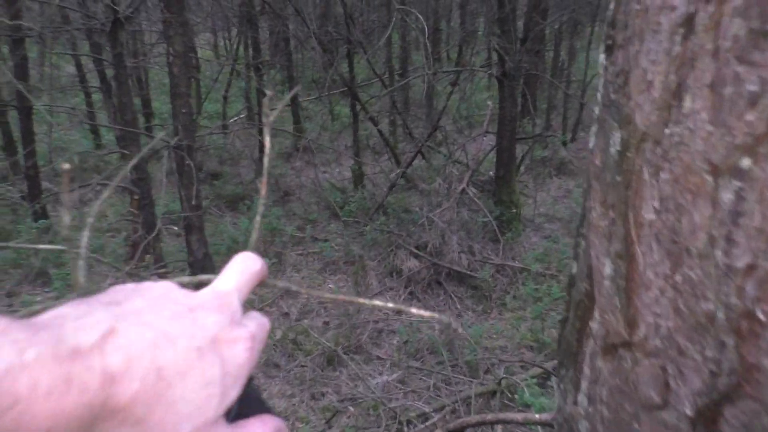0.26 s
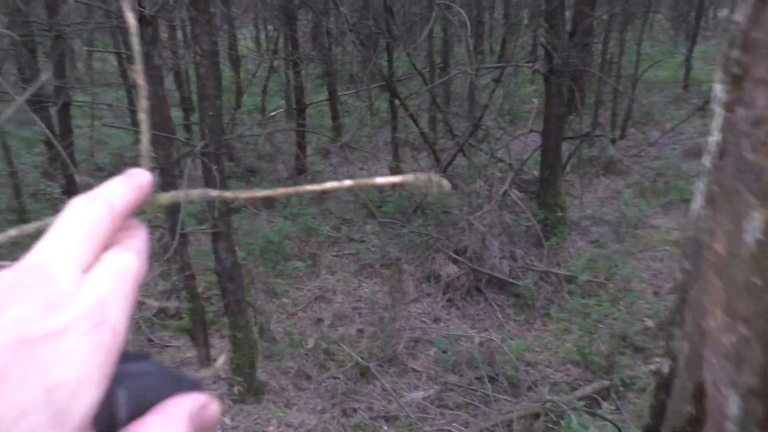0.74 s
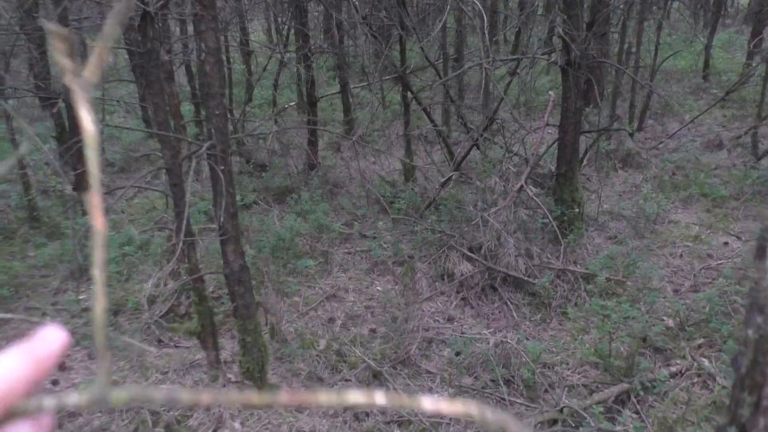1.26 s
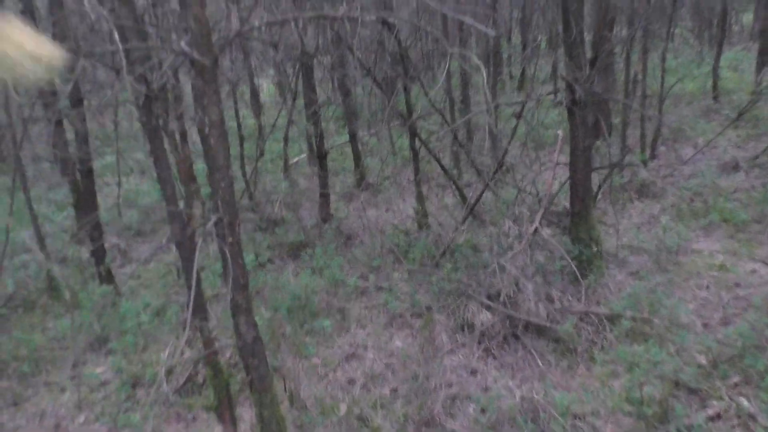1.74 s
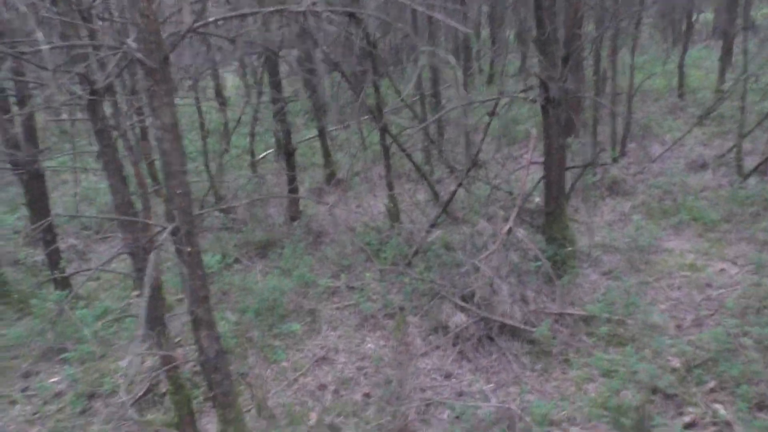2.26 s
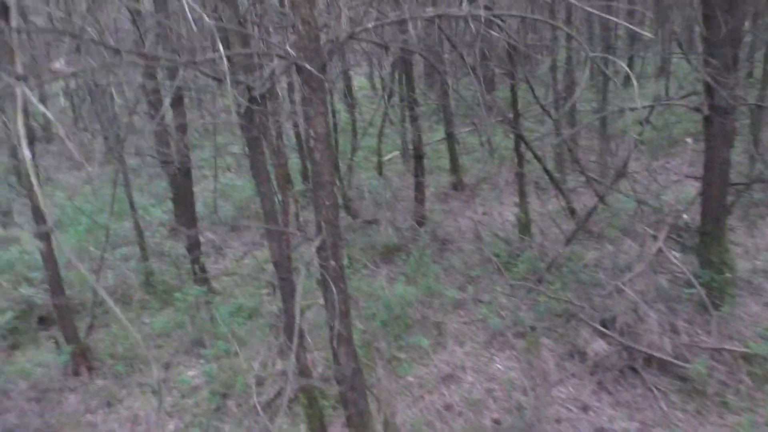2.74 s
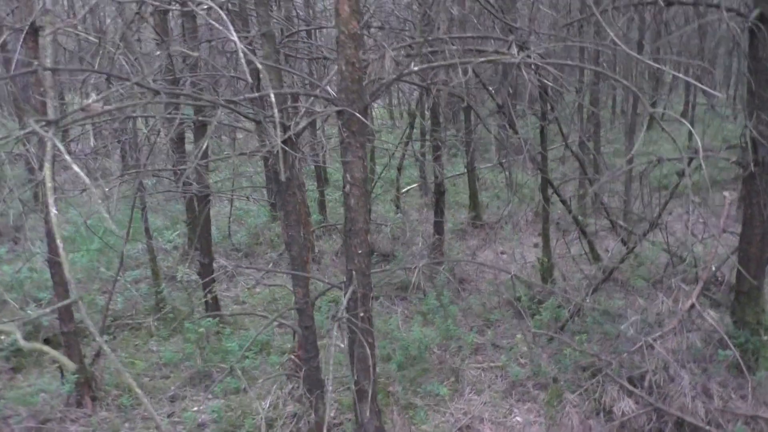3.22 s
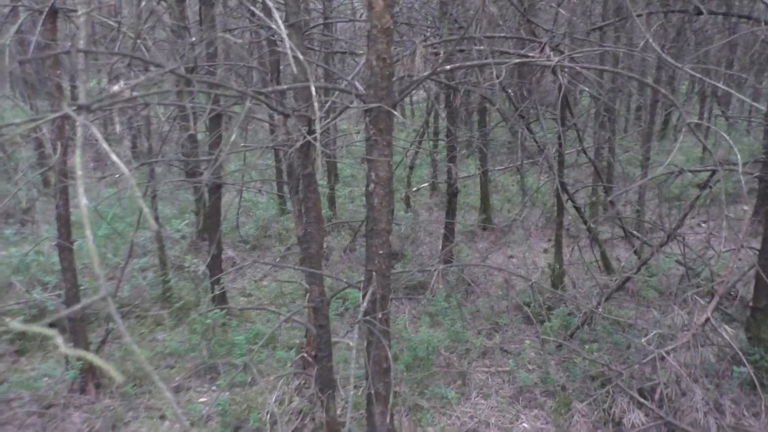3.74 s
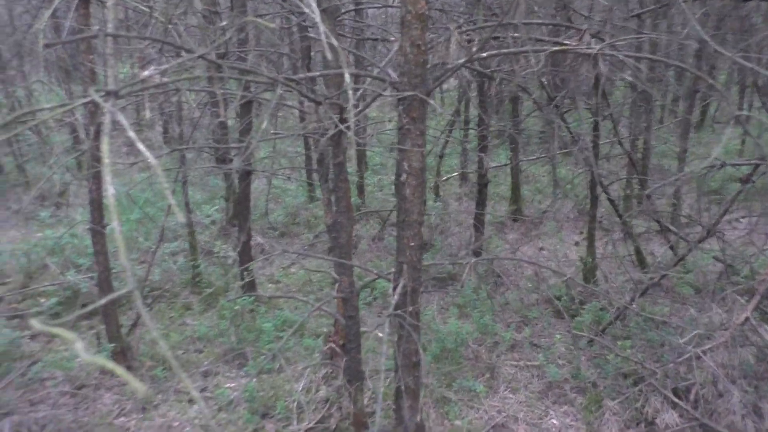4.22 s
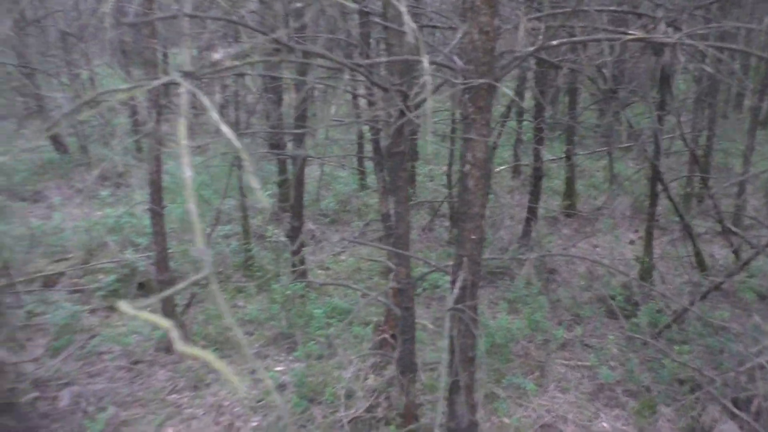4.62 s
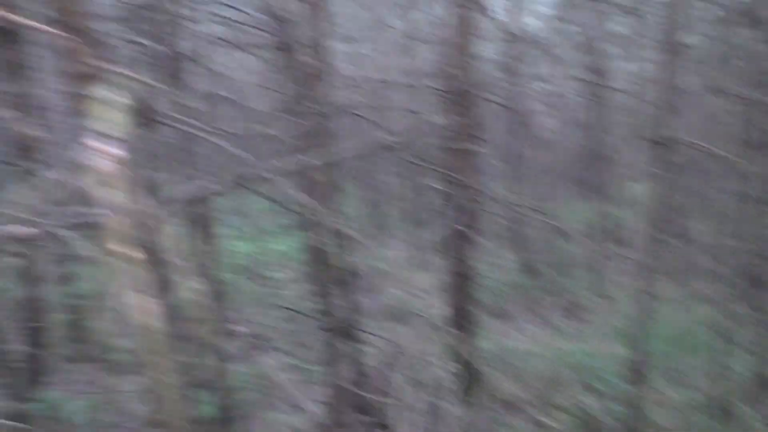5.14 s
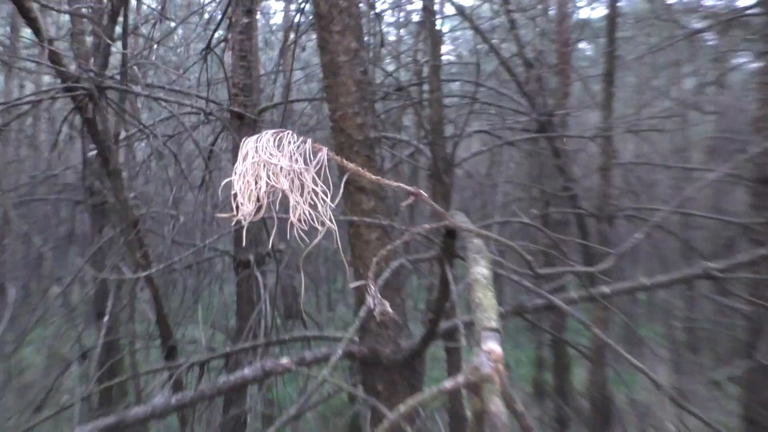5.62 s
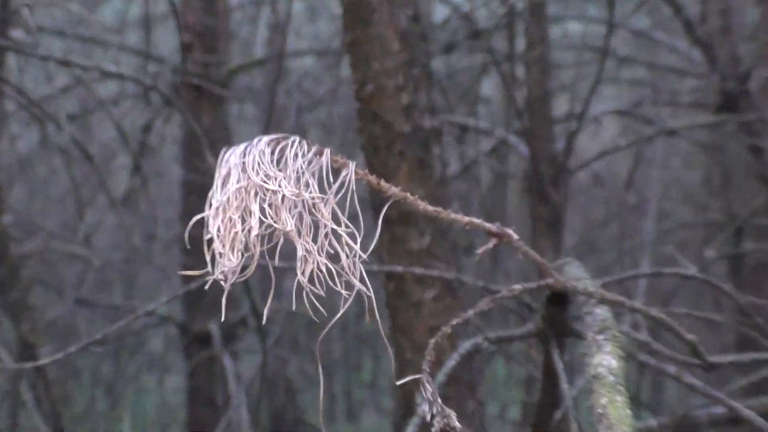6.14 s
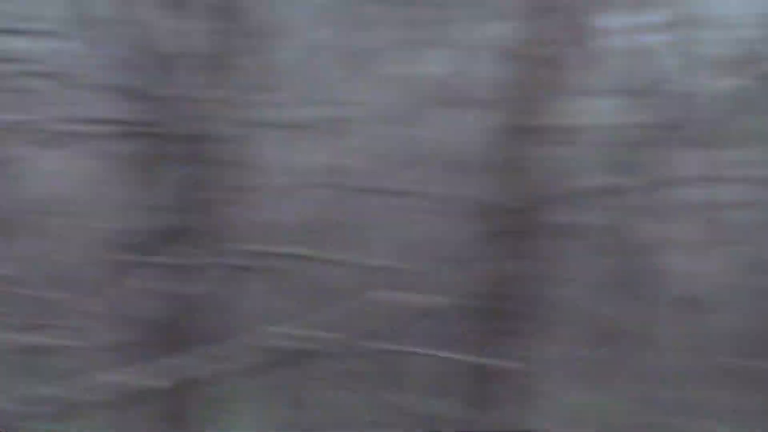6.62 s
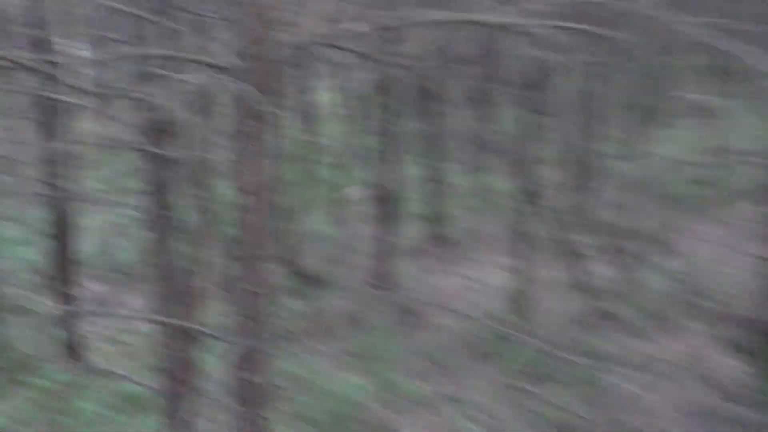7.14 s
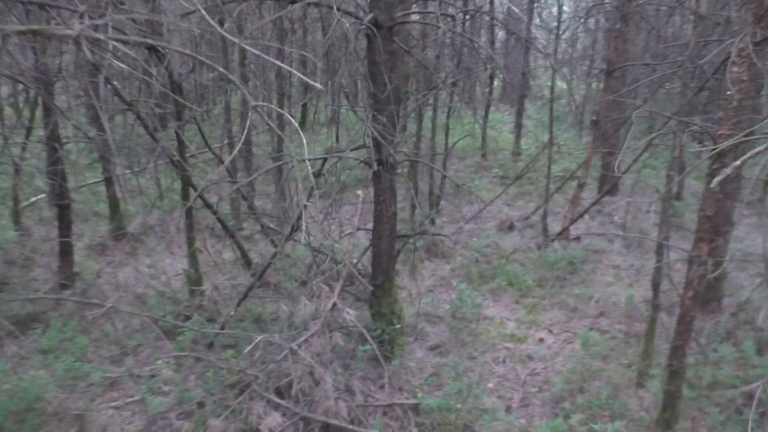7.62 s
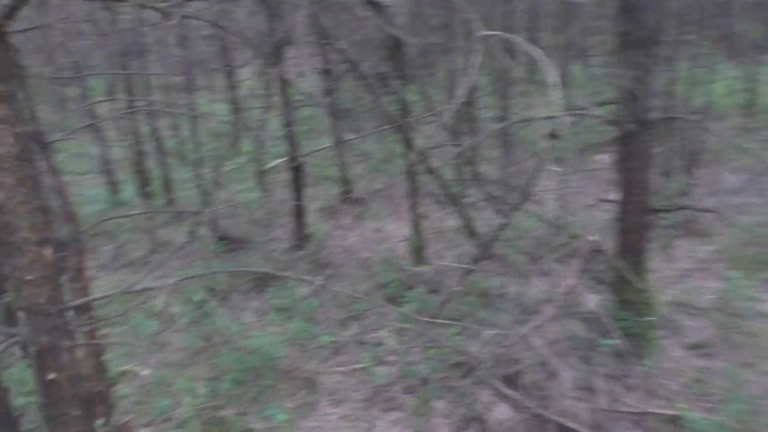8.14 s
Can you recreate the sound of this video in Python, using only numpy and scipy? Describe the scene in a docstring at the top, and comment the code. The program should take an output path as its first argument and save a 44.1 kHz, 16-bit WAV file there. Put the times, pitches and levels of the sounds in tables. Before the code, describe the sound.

Someone treads slowly through a dry pine wood, litter rustling and crunching while dead twigs snap sharply in irregular clusters over a faint airy hum.

```python
"""Dry litter rustles and crackles as someone treads slowly through a thin pine wood past dead twigs.
Each press drives grains of noise in three layers: leaves, stalks and soft ground.
Twigs snap as noise bursts with a bright crack, splintering, a ringing knock and falling bits.
Soles and sticks thud as damped low rings; a far hum of air, coloured noise, lies under it all."""
import sys
import numpy as np
from scipy import signal
from scipy.fft import rfft, irfft, next_fast_len
from scipy.io import wavfile

SR = 44100
rng = np.random.default_rng(int(sys.argv[2]) if len(sys.argv) > 2 else 0)


def generate_wav(signal):
    """Clip the signal to [-1, 1] and save it as 16-bit WAV at the path in sys.argv[1]."""
    frames = np.transpose(np.atleast_2d(signal))
    scaled = np.clip(frames, -1, 1) * 32767
    pcm = np.round(scaled).astype(np.int16)
    wavfile.write(sys.argv[1], SR, pcm)


N = 369537


def from_db(db):
    """Decibels to gain."""
    return 10 ** (np.asarray(db) / 20)


def rms_one(x):
    """Scale to rms 1."""
    return x / np.sqrt(np.mean(x ** 2) + 1e-20)


def peak_one(x):
    """Scale to peak 1."""
    return x / np.abs(x).max()


def in_time(rows):
    """Draw each column of a breakpoint curve sample by sample."""
    seconds, *columns = np.transpose(rows)
    t = np.arange(N) / SR
    return [np.interp(t, seconds, column) for column in columns]


def coloured(x, spectrum):
    """Shape a signal by a (Hz, dB) table, with the phase of a causal filter."""
    size = next_fast_len(len(x) + 2048)
    hz, db = np.transpose(spectrum)
    log_hz = np.log(np.arange(size // 2 + 1) * SR / size + 1)
    log_gain = np.interp(log_hz, np.log(hz), db) * np.log(10) / 20
    # Folding the cepstrum onto positive time gives minimum phase
    cepstrum = irfft(log_gain, size)
    cepstrum[1:size // 2] *= 2
    cepstrum[size // 2 + 1:] = 0
    response = np.exp(rfft(cepstrum))
    return irfft(rfft(x, size) * response, size)[:len(x)]


def drift(rate_hz):
    """Slow random wandering of spread 1: noise through a double one-pole lowpass."""
    r = np.exp(-2 * np.pi * rate_hz / SR)
    noise = rng.standard_normal(N + SR)
    slow = signal.lfilter([1], [1, -2 * r, r * r], noise)
    return rms_one(slow[SR:])   # skip the filter's start-up


def ring(x, hz, cycles):
    """A damped resonator: a unit click sets a sine ringing that falls 60 dB in so many cycles."""
    r = from_db(-60 * hz / (cycles * SR))
    w = 2 * np.pi * hz / SR
    return signal.lfilter([0, np.sin(w)], [1, -2 * r * np.cos(w), r * r], x)


def air():
    """Broad hum and hiss of the wood: coloured noise on a level curve, wavering a little."""
    # Far hum, lower after the loudest snap, before the lift below: (time [s], level [dB])
    hum = [(0.0, -62.5), (1.56, -63), (2.94, -59.5), (3.55, -62), (4.34, -60), (4.48, -68.5), (5.06, -65.5),
           (6.93, -61), (7.21, -61), (7.82, -60.5), (8.19, -60), (8.38, -52.5)]
    # Relative colour of the air: (frequency [Hz], level [dB per Hz])
    air_colour = [(15, -42), (25, -13), (74, 3), (167, 0), (357, 2.5), (456, 1), (582, -3.5), (806, -4),
                  (1030, 0), (2080, -11), (2810, -15), (4710, -56), (6170, -40), (12500, -17.5),
                  (16400, -21)]
    lift_db, waver_db, waver_hz = 2.5, 1.0, 4.6
    hum_db, = in_time(hum)
    level_db = hum_db + lift_db + waver_db * drift(waver_hz)
    return from_db(level_db) * rms_one(coloured(rng.standard_normal(N), air_colour))


def thuds():
    """Soles and sticks bump the ground: a brief noisy push rings the hollow litter for a few cycles."""
    # Bumps, peak taken before the low cut: (time [s], peak [dB], pitch [Hz])
    bumps = [(0.162, -47, 253), (0.319, -43, 286), (0.416, -48.5, 174), (0.463, -47, 262),
             (0.922, -48.5, 215), (1.693, -45.5, 350), (1.836, -43, 262), (2.034, -46, 226),
             (2.275, -40, 368), (2.317, -41.5, 208), (3.045, -40.5, 340), (3.07, -42.5, 473),
             (4.058, -42, 343), (4.478, -38.5, 490), (7.058, -46, 277), (7.351, -38, 432), (7.41, -38, 196),
             (7.42, -34.5, 427), (7.502, -53, 369), (8.012, -41, 352), (8.05, -34, 420), (8.092, -32, 403),
             (8.146, -31, 211), (8.206, -30, 245), (8.315, -45, 191)]
    push_t60_s, cycles = 0.027, 4.04
    out, length = np.zeros(N + SR), SR // 10
    push = from_db(-60 * np.arange(length) / SR / push_t60_s)
    noises = rng.standard_normal((len(bumps), length))
    for (s, peak_db, hz), noise in zip(bumps, noises):
        thud = ring(ring(push * noise, hz, cycles), hz, cycles)
        at = round(s * SR)
        out[at:at + length] += from_db(peak_db) * peak_one(thud)
    # Small things radiate no deep bass
    low_cut = signal.butter(3, 110., "high", fs=SR, output="sos")
    return signal.sosfilt(low_cut, out[:N])


def snaps():
    """Fibres tear in a burst: bright crack, splintering, the ring of the wood, bits falling on the litter."""
    # Twigs and stalks breaking: (time [s], crack peak [dB], crack pitch [Hz], knock peak [dB],
    # knock pitch [Hz], decay time before stretching [s], falling bits relative to the tear [dB])
    breaks = [(0.0596, -30, 10600.0, -35, 1640.0, 0.02, -19), (0.1819, -43, 9900.0, -34, 1840, 0.028, -14),
              (0.4166, -29, 11800.0, -35.5, 2450, 0.0086, -30),
              (0.5176, -28, 9500.0, -42, 2580.0, 0.0083, -32),
              (0.5363, -33, 10400, -42, 2170.0, 0.007, -36.0),
              (0.583, -28.5, 9000.0, -41, 2410.0, 0.005, -22),
              (0.6838, -43, 8400.0, -40.5, 1800, 0.017, -31),
              (0.7805, -40, 7400.0, -34, 1950, 0.0056, -36.0),
              (0.8687, -26.5, 11600, -38, 4260, 0.0088, -23),
              (0.9213, -26.5, 10600.0, -46, 3980.0, 0.005, -24),
              (0.9827, -41, 8300.0, -46, 2670.0, 0.014, -15), (1.0185, -25, 9800, -36, 1250, 0.004, -23),
              (1.1252, -46, 6160, -34.5, 2410.0, 0.011, -31), (1.148, -31, 5770, -25, 2670, 0.0071, -22),
              (1.1504, -48, 8200.0, -37.5, 1590.0, 0.14, -16), (1.1553, -29, 7950, -40, 4530, 0.03, -12),
              (1.1582, -36, 7650, -32, 4600, 0.015, -18), (1.181, -46, 5000.0, -43, 2000.0, 0.056, -30),
              (1.219, -41, 10600.0, -36.5, 2660, 0.011, -34.0),
              (1.2311, -48, 10100.0, -34, 2600, 0.0072, -36.0),
              (1.243, -48.0, 9900.0, -39.0, 2610.0, 0.0089, -34.0),
              (1.254, -55, 9000.0, -41, 2600.0, 0.0052, -30.0), (1.5662, -41, 7550, -49, 1600, 0.011, -39),
              (1.736, -34.5, 9700.0, -39.5, 2800, 0.0049, -24),
              (1.8003, -35.5, 7350, -52, 2130.0, 0.0098, -27.0),
              (1.837, -18, 12100, -30, 3160, 0.0034, -27), (2.0297, -16.5, 11400, -52, 1870, 0.0033, -29),
              (2.04, -29, 10300, -40.5, 1180, 0.0096, -36.0),
              (2.071, -31.0, 10100.0, -53, 1240, 0.0052, -38), (2.1957, -35, 9500, -51, 900.0, 0.016, -12),
              (2.2099, -39, 9700.0, -32.5, 2360, 0.006, -18),
              (2.3184, -12, 10500, -32.5, 3270, 0.0055, -43), (2.341, -25, 9400.0, -42, 1330, 0.0056, -35),
              (2.4145, -8.5, 11200, -19.5, 2940, 0.01, -34), (2.4181, -16.5, 8950, -21.5, 2240, 0.025, -36),
              (2.589, -30, 11700, -43.5, 950, 0.006, -29), (2.6855, -24, 11100, -30.5, 4400, 0.0062, -12),
              (2.747, -28, 10900.0, -35, 3880, 0.038, -30),
              (2.7668, -20, 8900.0, -30, 2860.0, 0.008, -24.0),
              (2.7977, -7.5, 12100, -28, 3060, 0.0047, -30), (2.8066, -8, 11300, -24, 4310.0, 0.0054, -32),
              (2.937, -28, 11800.0, -37, 2960, 0.0069, -36.0),
              (2.9754, -28, 11200, -43, 3420.0, 0.004, -26), (3.049, -34, 9800.0, -40.5, 1240, 0.012, -12),
              (3.0735, -27, 11500, -41, 3060, 0.0035, -39),
              (3.3068, -38, 9700.0, -42.5, 2130, 0.021, -36.0),
              (3.3242, -32, 10200, -46.0, 2450.0, 0.0059, -30),
              (3.358, -33, 11000.0, -46, 970, 0.0072, -12.5), (3.392, -33, 9800, -38, 2930, 0.0095, -36.0),
              (3.5288, -39, 6670, -44.5, 3960.0, 0.0043, -36.0),
              (3.6018, -40, 7900, -48, 3080.0, 0.011, -26),
              (3.655, -42, 9000.0, -43.5, 1790.0, 0.009, -23.0),
              (3.8312, -37, 8900.0, -40.5, 1590, 0.0067, -17), (3.9946, -42, 8900, -44.5, 1520, 0.018, -10),
              (4.0595, -34, 9700.0, -34, 1930, 0.0013, -30), (4.269, -36.5, 6760, -42, 1830, 0.0071, -18),
              (4.3211, -27, 11900, -43.0, 2200, 0.02, -36.0),
              (4.4787, -6, 11500, -20.5, 3200, 0.0059, -27.5),
              (4.7312, -48, 10200.0, -44.5, 2620, 0.028, -29), (4.98, -45.5, 6760, -42.5, 1180, 0.022, -19),
              (5.0642, -42.5, 9800.0, -37.5, 1400, 0.0077, -16),
              (5.092, -38, 11600, -43.5, 2520, 0.05, -11), (5.2957, -27, 9400, -34, 1300, 0.013, -14),
              (5.3554, -42, 8000, -38, 2330, 0.019, -38), (5.6261, -42, 8600.0, -49.5, 1050, 0.008, -36.0),
              (5.9582, -32, 8700, -37.5, 1790, 0.015, -23),
              (6.2988, -35, 10800.0, -52, 1080, 0.0036, -36.0),
              (6.3818, -50, 10400.0, -47, 1500, 0.007, -9), (6.397, -38.5, 7400, -34.5, 2450, 0.014, -38),
              (6.4634, -42, 12200.0, -62, 1160.0, 0.009, -27.0),
              (6.5191, -38, 5740, -40.5, 1360, 0.0092, -24), (7.0107, -42, 9500.0, -34.5, 2180, 0.032, -20),
              (7.0584, -24.5, 10600, -28, 2320, 0.01, -28), (7.064, -42, 12100.0, -35, 1520, 0.017, -24),
              (7.1, -25.5, 7900, -29.5, 2020.0, 0.0058, -38),
              (7.107, -31, 9900.0, -47, 1390, 0.0079, -36.0),
              (7.113, -33, 9900.0, -39, 2170.0, 0.0041, -36.0),
              (7.3088, -23, 10000, -34.5, 1600, 0.0058, -18), (7.3546, -12, 10300, -28, 2700, 0.007, -24),
              (7.416, -30, 7650, -35, 1280, 0.015, -14), (7.5058, -39, 10300.0, -34.5, 2020, 0.0076, -38),
              (7.829, -36, 10000.0, -33.5, 1380, 0.01, -13), (7.942, -18, 9000, -37, 2740, 0.017, -36.0),
              (8.0112, -10, 7000, -18.5, 5070, 0.014, -23.5), (8.0565, -26, 8000, -29, 1700, 0.02, -6),
              (8.0903, -20.5, 6800, -21.5, 2300, 0.0054, -20),
              (8.1125, -22, 8300.0, -20.5, 1790, 0.0055, -36), (8.1458, -13.5, 10700, -27, 1800, 0.01, -17),
              (8.1754, -24, 10700, -44, 1240, 0.0079, -30), (8.182, -29, 12000.0, -34, 2000.0, 0.0073, -30),
              (8.205, -12.5, 10900.0, -27.5, 1540, 0.0091, -28),]
    # Relative colour of a crack around its own pitch: (share of the pitch [ratio], level [dB per Hz])
    crack_colour = [(.1, -46.5), (.3, -16.5), (.6, -6), (1.0, -2.5), (1.3, -5), (1.7, -8)]
    # Relative colour of splintering wood: (frequency [Hz], level [dB per Hz])
    splinter_colour = [(600, -14), (1300, -6), (2500, 5), (4500, 5.5), (7000, 2), (11000, -11)]
    scatter_t60_s, knock_cycles, splinter_lift_db = 0.2, 4.6, 2.5
    out, length = np.zeros(N + SR), SR // 8
    t = np.arange(length) / SR
    noise = rng.standard_normal((len(breaks), 2, length))
    for row, (tear, scatter) in zip(breaks, noise):
        s, crack_db, crack_hz, knock_db, knock_hz, decay_s, scatter_db = row
        # Sharp at first, then lingering
        burst_t60_s = max(1.5 * decay_s, .002)
        burst = tear * from_db(-60 * (t / burst_t60_s) ** .7)
        falling_bits = scatter * from_db(scatter_db - 60 * t / scatter_t60_s)
        debris = burst + falling_bits
        crack = peak_one(coloured(debris, np.multiply(crack_colour, [crack_hz, 1])))
        jolt = np.diff(burst, prepend=0)
        knock = peak_one(ring(ring(jolt, knock_hz, knock_cycles), knock_hz, knock_cycles))
        # The weaker of crack and knock sets the splintering: a mere tap hardly splinters
        splinter_db = min(crack_db, knock_db) + splinter_lift_db
        splinter = peak_one(coloured(debris, splinter_colour))
        snap = from_db(crack_db) * crack + from_db(knock_db) * knock + from_db(splinter_db) * splinter
        at = round(s * SR)
        out[at:at + length] += snap
    return out[:N]


def pressure():
    """Layer levels in dB: each press rises fast, swells or sags, lets go and settles; powers add."""
    # A foot or arm presses the litter: (start [s], length [s], leaf rustle [dB],
    # swell while pressed [dB], stalk scrape [dB], ground crunch [dB])
    presses = [(0.0, 0.11, -70, -0.5, -58.5, -56.5), (0.166, .16, -51.5, 0.5, -55.5, -53.5),
               (0.38, .16, -51, 2, -58.5, -57.5), (0.606, .15, -60, 0, -61, -59),
               (0.82, 0.21, -56.5, 2, -62, -60), (1.122, 0.21, -60.5, 1.5, -66, -66),
               (1.382, 0.263, -72, 1.5, -70.5, -68), (1.68, 0.25, -62.5, 4.5, -63, -67.5),
               (1.963, 0.13, -52.5, 0, -61, -57.5), (2.142, 0.2, -53, 4.5, -59.5, -56),
               (2.463, 0.17, -61.5, 2.5, -60.5, -59.5), (2.675, 0.14, -40, 1, -50, -47.5),
               (2.872, 0.15, -49, -3, -53.5, -51), (3.08, 0.26, -53.5, -3.5, -56, -58),
               (3.384, 0.31, -59.5, -5, -61, -62), (3.804, 0.46, -68, 1.5, -70, -64),
               (4.17, 0.28, -56.5, 4.5, -63, -60), (4.516, 0.07, -53.5, -2.5, -68.5, -74),
               (4.688, 0.31, -69, 2.5, -67, -70.5), (5.076, 0.38, -76, -5.5, -67.5, -64),
               (5.477, 0.53, -68, -2, -75, -80), (6.196, 0.13, -64.5, 4.5, -73.5, -74),
               (6.46, 0.2, -81, 1.5, -72, -75), (6.972, .2, -58.5, 9.5, -64.5, -63),
               (7.202, 0.19, -50.5, 0, -54, -52.5), (7.426, .09, -41, -1, -49.5, -47),
               (7.562, 0.19, -59.5, -2.5, -59, -67), (7.812, 0.14, -45, 5.5, -53.5, -55),
               (7.96, 0.095, -41.5, -1.5, -47.5, -50.5), (8.079, 0.12, -43, 2, -45, -49.5),
               (8.243, 0.11, -43.5, -1.5, -48.5, -53.5)]
    # Faint stir between presses, one level [dB] each for leaves, stalks, ground
    rest_db = [-69, -68.5, -69.5]
    attack_db_per_s, release_db_per_s = 446, 250
    settle_db, settle_db_per_s = -8, 55   # after letting go: fainter and slower
    t = np.arange(N) / SR
    power = from_db(rest_db)[:, None] ** 2 * np.ones(N)
    for s, length, leaf_db, swell_db, stalk_db, ground_db in presses:
        before = np.maximum(s - t, 0)
        after = np.maximum(t - s - length, 0)
        held_db = swell_db * np.clip((t - s) / length, 0, 1)
        letting_go_db = np.maximum(-release_db_per_s * after, settle_db - settle_db_per_s * after)
        shape_db = held_db - attack_db_per_s * before + letting_go_db
        layer_power = from_db([leaf_db, stalk_db, ground_db]) ** 2
        power = power + np.outer(layer_power, from_db(2 * shape_db))
    return 10 * np.log10(power)


def grains(level_db, per_s, spread_db, grain_s, smooth, clump_db, spectrum, count):
    """Short noise puffs of uneven size and colour, over a smooth share of friction noise."""
    # Harder pressure breaks more pieces; per_s is the rate at quiet_db
    denser, quiet_db = .6, -60.5
    rate = per_s * from_db(denser * (level_db - quiet_db))
    # More pieces are each smaller, so the level curve keeps charge of loudness
    sizes = from_db(spread_db * np.minimum(rng.exponential(1, N), 5)) / np.sqrt(rate)
    clumping = from_db(clump_db * drift(15.0))
    born = rng.random(N) < rate * clumping / SR
    edges = np.geomspace(spectrum[0][0], spectrum[-1][0], count + 2)
    kind = rng.integers(0, count, N)
    fade = np.exp(-1 / (grain_s * SR))
    crackle = 0
    for k in range(count):   # each kind of piece sounds in its own wide band
        starts = sizes * born * (kind == k) + 1e-18
        puffs = signal.lfilter([1], [1, -fade], starts)
        band = signal.butter(1, [edges[k], min(edges[k + 2], 19000)], "band", fs=SR)
        pieces = signal.lfilter(*band, puffs * rng.standard_normal(N))
        crackle = crackle + rms_one(pieces) * np.sqrt(edges[k + 1])
    friction = smooth * rng.standard_normal(N) * np.sqrt(SR / 2 / edges[-1])
    mix = rms_one(crackle) + friction
    return from_db(level_db) * rms_one(coloured(mix, spectrum))


def litter():
    """Leaves, stalks and soft ground each answer the pressure with their own grains."""
    # Relative colours of the three layers: (frequency [Hz], level [dB per Hz])
    leaf_colour = [(2500, -4.5), (4000, -0.5), (6400, -1), (9900, 4.5), (12000, 6), (13500, 1.5),
                   (15000, 6), (18000, -2)]
    stalk_colour = [(700, -24), (1200, 5), (1900, 2.5), (2800, 2.5), (4000, -1), (6000, -17)]
    ground_colour = [(30, -37), (90, -14), (150, -6.5), (260, -3), (380, -0.5), (500, -3.5), (750, -17)]
    leaf_db, stalk_db, ground_db = pressure()
    leaves = grains(leaf_db, per_s=600., spread_db=4.1, grain_s=0.00048, smooth=0.73,
                    clump_db=5., spectrum=leaf_colour, count=4)
    stalks = grains(stalk_db, per_s=300., spread_db=4.1, grain_s=0.00069, smooth=0.85,
                    clump_db=4., spectrum=stalk_colour, count=3)
    ground = grains(ground_db, per_s=60., spread_db=4.3, grain_s=0.0026, smooth=1.0,
                    clump_db=4.3, spectrum=ground_colour, count=2)
    return leaves + stalks + ground


def scene():
    """Everything reaches one microphone in the open: a plain sum in one channel."""
    mono = air() + thuds() + snaps() + litter()
    return mono[None]


def record(dry):
    """The capsule softens the treble, steps down at the very top, then the band ends."""
    soften = signal.butter(2, 15000, fs=SR, output="sos")
    step_down = signal.ellip(9, .5, 40, 16500, fs=SR, output="sos")
    band_end = signal.cheby2(12, 50, 18200, fs=SR, output="sos")
    soft = signal.sosfilt(soften, dry)
    stepped = signal.sosfilt(step_down, soft)
    return signal.sosfilt(band_end, stepped)


dry = scene()
out = record(dry)
generate_wav(out)
```